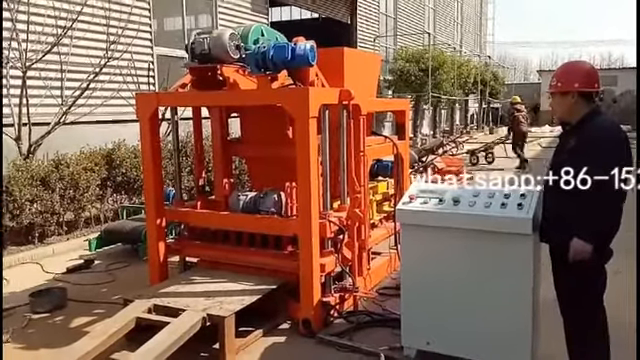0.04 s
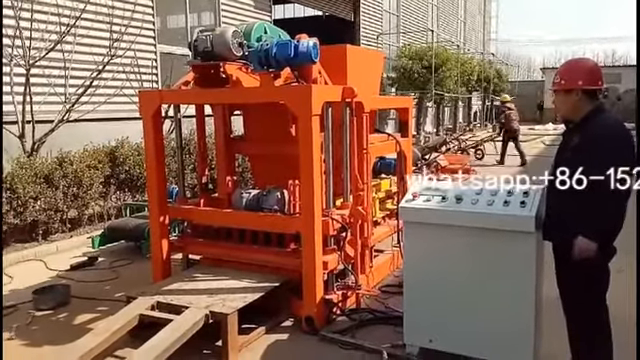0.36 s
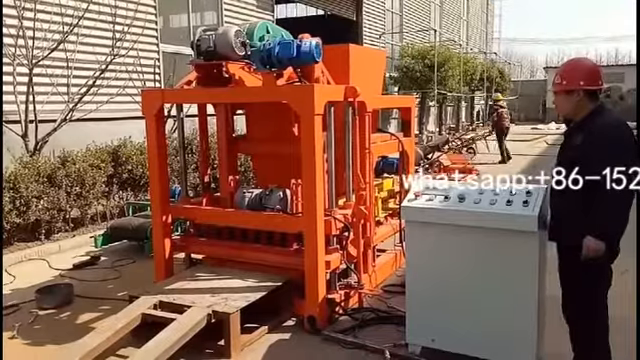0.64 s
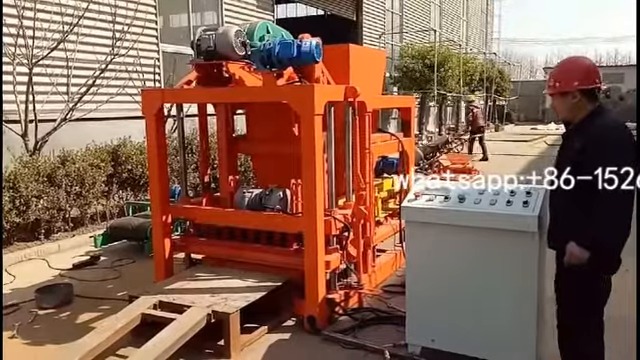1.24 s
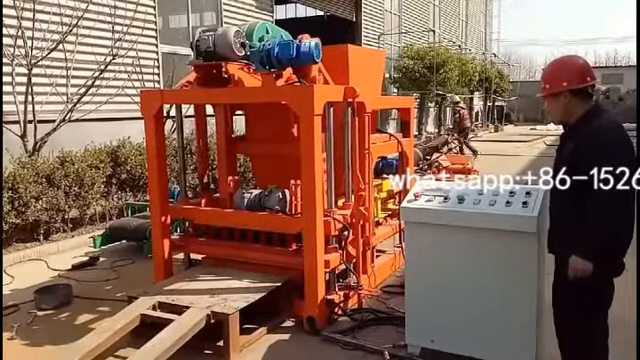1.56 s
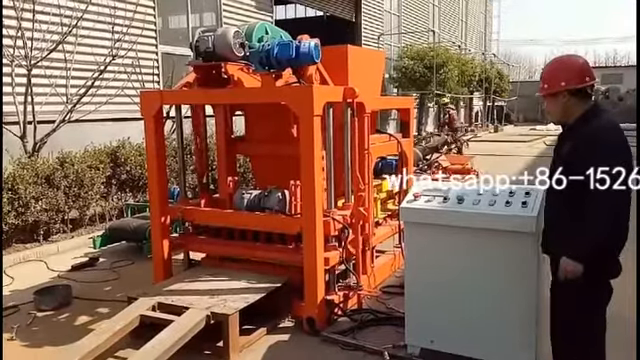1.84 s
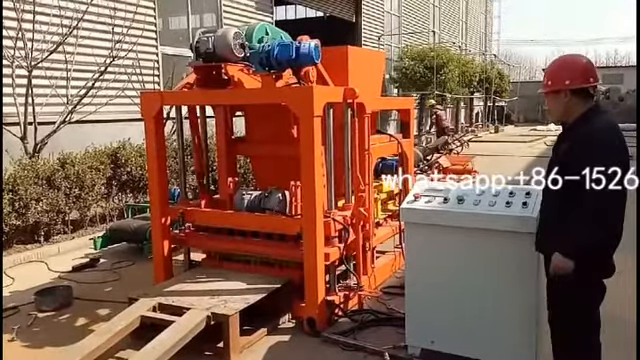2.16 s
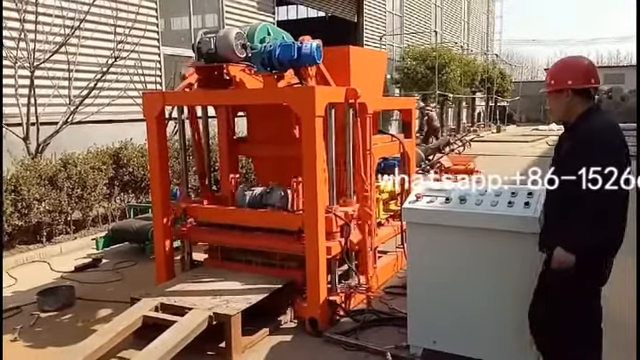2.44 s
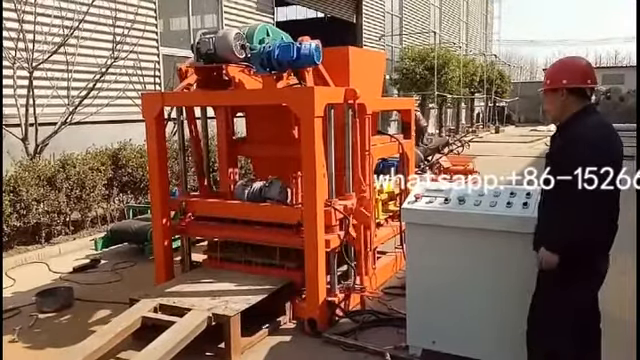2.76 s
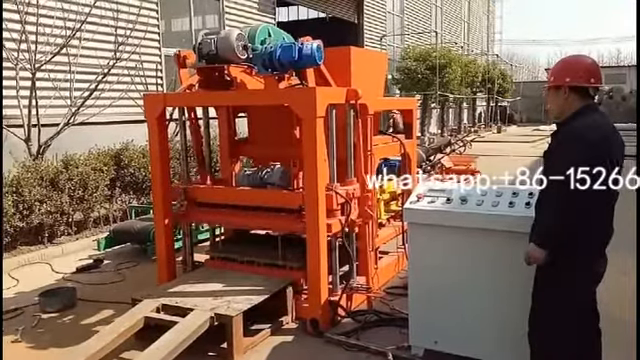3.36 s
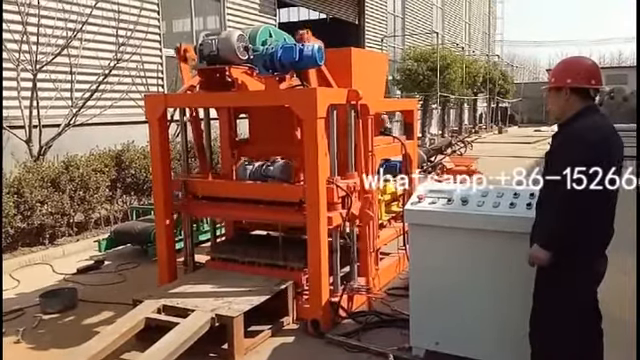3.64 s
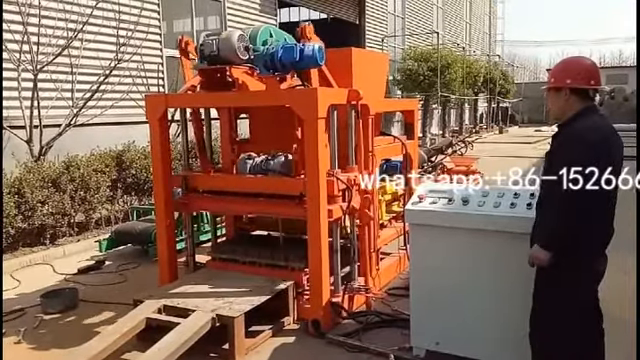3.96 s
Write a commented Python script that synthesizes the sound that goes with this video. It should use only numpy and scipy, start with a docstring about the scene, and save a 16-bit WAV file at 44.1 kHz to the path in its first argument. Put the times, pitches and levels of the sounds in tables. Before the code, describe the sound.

A concrete block machine shakes with a loud steel rattle, then runs down as a loose plate rings shrilly. Its motor drones on under metal clanks and hydraulic hiss, close to the microphone in an open yard.

```python
"""A concrete block machine in an open yard, close to a stereo microphone and a little to its left.
First the shaker hammers the steel mould once a turn and loose steel rattles over the motor's drone.
Within a second and a half it runs down while a loose plate rings shrilly. From about 1.1 s the mould
clanks as it is lifted, with a tail from the yard walls. The frame booms, oil hisses and whines in
the valves from 1.7 s, and the motor and hydraulic pump drone on to the end."""
import sys
import numpy as np
from scipy import signal
from scipy.io import wavfile
from scipy.ndimage import uniform_filter1d

SR = 44100
rng = np.random.default_rng(int(sys.argv[2]) if len(sys.argv) > 2 else 0)


def dump_mix(stems):
    """Bounce the given channels to the path in sys.argv[1] as a 16-bit WAV at rate SR."""
    frames = np.atleast_2d(stems).T  # one column per channel
    limited = np.clip(frames, -1, 1)  # hard clip at full scale
    pcm = np.round(limited * 32767).astype(np.int16)
    wavfile.write(sys.argv[1], SR, pcm)


N = 176400

# speed of the shaker: time_s, turns_per_s
SHAKER_SPEED = [(0, 47), (.36, 46), (.48, 44.6), (.56, 42.9), (.66, 39.8), (.9, 37), (1.35, 23.6)]
# blows on the mould, and hum of the table: time_s, level_db
BLOW_LEVEL = [(0, -13.5), (.15, -8), (.4, -13.5), (.56, -16), (.7, -22), (.9, -40), (1.1, -37), (1.35, -58),
              (1.6, -92)]
HUM_LEVEL = [(0, -8), (.14, -10.5), (.32, -12), (.45, -15), (.55, -17), (.64, -23), (.8, -26.5), (1.0, -37),
             (1.5, -75)]
# ring of the mould: frequency_hz, density_db
MOULD_COLOUR = [(60, -33), (150, -16), (230, -8.5), (320, 1), (450, -2), (700, -5), (1100, -2.5),
                (2000, -13), (4500, -13.5), (9000, -34.5)]
# partials of the hum: speed_multiple, level_db
HUM_PARTIALS = [(2, -18), (3, -12), (4, -14), (5, -16), (6, -15), (7, -8), (8, -20), (9, -12), (12, -12),
                (16, -19), (19, -12)]
TABLE_RESONANCE_HZ, TABLE_HALF_WIDTH_HZ, TABLE_BOOST_DB = 304, 5.8, 10.5
BLOW_JITTER_S, BLOW_SPREAD_DB = .0007, 2


def shaker(turns):
    """The table hums on multiples of its speed and throws the mould against it once a turn."""
    turn_starts = np.flatnonzero(np.diff(np.floor(turns)))
    timing, force = rng.standard_normal((len(turn_starts), 2)).T
    landings = turn_starts + (BLOW_JITTER_S * SR * timing).astype(int)
    blows = np.zeros(N)
    blows[np.clip(landings, 0, N - 1)] = from_db(BLOW_SPREAD_DB * force)
    mould = rms_one(strike(blows, dense_ring(MOULD_COLOUR, t60_s=.15)))
    hum, speed = 0, in_time(SHAKER_SPEED)
    for multiple, db in HUM_PARTIALS:
        # each partial swells as it slides through the table's resonance
        detuning = (multiple * speed - TABLE_RESONANCE_HZ) / TABLE_HALF_WIDTH_HZ
        gain = from_db(db + TABLE_BOOST_DB / (1 + detuning ** 2) + 3.2 * drift(6.4))
        phase = 2 * np.pi * (multiple * turns + rng.random()) + .42 * drift(28)
        hum = hum + gain * np.sqrt(2) * np.sin(phase)
    return from_db(in_time(BLOW_LEVEL)) * mould + from_db(in_time(HUM_LEVEL)) * hum


# rattle of the loose steel: time_s, level_db
RATTLE_LEVEL = [(0, -5.5), (.2, -6.5), (.42, -7), (.6, -11), (.78, -13.5), (.92, -20), (1.1, -22),
                (1.3, -33.5), (1.6, -73)]
# its dense ring: frequency_hz, density_db
STEEL_COLOUR = [(100, -18.5), (300, -2.5), (700, -4.5), (1150, -2.5), (1650, 0.5), (1950, -7.5),
                (2400, 1.5), (2800, -6.5), (3200, 1), (3750, -10.5), (4400, -1.5), (5000, -12),
                (5600, -6.5), (6200, -6), (7200, -22.5), (8200, -51.5), (15000, -33)]
# its clear modes: pitch_hz, level_db, t60_s
STEEL_MODES = [(880, -19, 0.04), (1090, -13, 0.031), (1310, -19.5, 0.071), (1434, -22, .14),
               (1638, -13.5, 0.036), (1780, -22, 0.065), (2415, -20.5, 0.03), (3185, -20.5, .08),
               (3422, -16.5, .05), (4190, -15, .04), (4520, -23.5, .12)]
RATTLES_PER_S, RATTLE_BUNCHING, RATTLE_SPREAD_DB = 700, .6, 2
SIZZLE_HZ, SIZZLE_LOSS_DB_PER_DB = 7660, .97


def rattle(turns, parts=4):
    """Loose steel parts clatter, each mostly at its own point of the turn."""
    clatter = 0
    for _ in range(parts):
        bunching = 1 + RATTLE_BUNCHING * np.cos(2 * np.pi * (turns + rng.random()))
        touches = rng.random(N) < RATTLES_PER_S / parts * bunching / SR
        force = from_db(RATTLE_SPREAD_DB * np.clip(rng.standard_normal(N), -2, 2))
        clicks = touches * force * rng.choice([-1, 1], N)
        ring = dense_ring(STEEL_COLOUR, t60_s=.086)
        clatter = clatter + strike(clicks, ring + clear_modes(STEEL_MODES, ring.shape[1]))
    level_db, clatter = in_time(RATTLE_LEVEL), rms_one(clatter)
    # the top sizzle fades faster than the rest as the rattle weakens
    sizzle_gain = from_db(SIZZLE_LOSS_DB_PER_DB * (level_db - level_db.max()))
    sizzle = sizzle_gain * filtered(clatter, "high", SIZZLE_HZ, order=5)
    return from_db(level_db) * (filtered(clatter, "low", SIZZLE_HZ, order=5) + sizzle)


# modes of the loose plate: pitch_hz, level_db
PLATE_MODES = [(5491, -14), (6108, 0), (7144, -16), (7690, -13), (9383, -21), (10083, -22), (11672, -26),
               (11940, -29), (13186, -30), (14505, -33)]
# its ringing: time_s, level_db
PLATE_LEVEL = [(0, -23.5), (.6, -32), (.66, -26), (.78, -30), (.84, -22), (.95, -33), (1.0, -31),
               (1.03, -34), (1.065, -27), (1.16, -38.5), (1.2, -55), (1.35, -80)]
# brief flares of its lower modes: peak_s, half_length_s, pitch_hz, level_db
PLATE_FLARES = [(.905, .025, 5500, -33), (1.03, .025, 5500, -35), (1.025, .045, 4893, -30)]
PLATE_WAVER_DB, PLATE_WAVER_HZ = 2.2, 22


def plate():
    """A loose plate rings shrilly as the shaking dies; its modes waver, and lower ones flare up."""
    t = np.arange(N) / SR

    def mode(hz):
        """One mode, unsteady in strength and phase."""
        wander = np.array([drift(PLATE_WAVER_HZ), drift(PLATE_WAVER_HZ)])
        gain = from_db(PLATE_WAVER_DB * drift(PLATE_WAVER_HZ))
        return gain * np.sqrt(2) * np.sin(2 * np.pi * hz * t + wander)

    ringing = sum(from_db(db) * mode(hz) for hz, db in PLATE_MODES)
    flares = sum(from_db(db) * np.exp(-((t - peak_s) / half_s) ** 2) * mode(hz)
                 for peak_s, half_s, hz, db in PLATE_FLARES)
    return from_db(in_time(PLATE_LEVEL)) * ringing + flares


# clanks of the lifted mould: start_s, level_db, tilt_db_per_octave, chatter_s, thud_db
MOULD_CLANKS = [(1.089, -16, -2.5, 0.01, -9), (1.15, -22.5, -4, .02, -7), (1.325, -22.5, -2.5, .03, -17),
                (1.381, -19, -2, 0.0077, 2), (1.487, -28, -7.5, 0.025, -8), (2.219, -22.5, 2.5, .036, -22),
                (2.326, -25.5, -3, .04, -6), (2.346, -22, 0, .035, -5.5), (2.372, -30, 2, 0.025, -8),
                (2.425, -27, -3, 0.066, -6), (2.895, -26, -4, 0.039, -4), (2.927, -19.5, 2.5, 0.021, -10),
                (2.966, -19.5, 8.5, 0.03, -3), (3.343, -30, -2, 0.005, -20), (3.545, -18.5, 7.3, 0.031, -3),
                (3.599, -22.5, 0.5, 0.066, -5.5), (3.64, -27, -2, 0.08, -10), (3.984, -31, -3, 0.024, -4)]
# dense ring of the frame: frequency_hz, density_db
FRAME_COLOUR = [(120, -25), (400, 3), (620, -8), (830, 3.5), (1200, 1.5), (2100, 0.5), (3500, 2.5),
                (5000, -4.5), (6700, 0), (7400, -30.5), (8200, -42), (11000, -38), (15000, -45.5)]
# its clear modes: pitch_hz, level_db, t60_s
FRAME_MODES = [(835, -13, .07), (1177, -19.5, 0.037), (1665, -18, 0.086), (3420, -21.5, .4),
               (4650, -19, .15), (6160, -19.5, .15)]
CHATTER_PER_S, YARD_TAIL_DB = 1100, -8.5


def clanks():
    """A first touch and a dying chatter on frame and mould; the yard walls send back a tail."""
    out, t = np.zeros((2, N)), np.arange(SR) / SR
    tail = from_db(YARD_TAIL_DB) * dense_ring(FRAME_COLOUR, t60_s=.7, tilt_db=-.5)
    size = tail.shape[1]
    modes = clear_modes(FRAME_MODES, size)
    for start_s, db, tilt_db, chatter_s, thud_db in MOULD_CLANKS:
        touches = rng.random(SR) < CHATTER_PER_S / SR
        clicks = touches * rng.standard_normal(SR) * np.exp(-t / chatter_s)
        clicks[0] = 2.5  # the firm first touch
        clicks *= np.sqrt(chatter_s * SR / np.sum(clicks ** 2))  # longer chatter carries more energy
        frame = dense_ring(FRAME_COLOUR, t60_s=.065, tilt_db=tilt_db) + modes
        start = int(start_s * SR)
        hit = strike(clicks, frame + tail + from_db(thud_db) * thud(size))[:, :N - start]
        out[:, start:start + hit.shape[1]] += from_db(db) * hit
    return out


def thud(size, band_hz=(400, 1250), t60_s=.07):
    """The short, low ring of the heavy mould after one touch; unit energy."""
    dying = rng.standard_normal((2, size)) * decay(size, t60_s)
    band = filtered(dying, "band", band_hz)
    return rms_one(spread(*band, np.mean(band_hz))) / np.sqrt(size)


# motor's roar, frame's boom, oil's hiss and pump's thrum: time_s, level_db
MOTOR_LEVEL = [(0, -22.5), (.95, -31.5), (1.2, -21.5), (2.0, -25), (2.6, -24), (3.2, -25), (3.5, -24.5),
               (4, -25)]
BOOM_LEVEL = [(0, -72), (1.05, -44), (1.33, -28), (1.52, -23), (1.66, -19.5), (1.8, -25), (1.95, -42),
              (4, -47.5)]
OIL_LEVEL = [(0, -26), (1.6, -67), (1.71, -40), (1.81, -32.5), (2.15, -40), (2.5, -36), (2.85, -36.5),
             (3.1, -30), (3.25, -40), (4, -40)]
THRUM_LEVEL = [(0, -42), (1.1, -41), (1.24, -26), (1.4, -35), (1.5, -30.5), (2.2, -41), (2.7, -29),
               (2.95, -33.5), (3.3, -25.5), (3.48, -42), (4, -31)]
# roar and hiss: frequency_hz, density_db
MOTOR_COLOUR = [(15, -44), (25, -8.5), (92, 5.5), (194, -2), (356, 1), (431, -4), (562, -7), (789, -5),
                (1250, -11.5), (1510, -8.5), (1930, -13.5), (3520, -16.5), (5060, -27), (6280, -26),
                (8000, -134), (10400, -86), (17600, -120)]
OIL_COLOUR = [(900, -26.5), (1900, 5), (2600, 8.5), (3100, 6), (3800, 6), (4400, 6), (5000, 0.5),
              (6400, 3.5), (7200, -2), (8000, -38), (15000, -59)]
# tones of motor and pump: pitch_hz, level_db
PUMP_TONES = [(91.5, -38), (210, -40), (322, -45), (366, -39), (413, -35.5), (850, -41), (1525, -41),
              (1590, -46.5), (2579, -47)]


def power_pack():
    """Behind the steel: motor roar, rough pump tones, a swelling boom and thrum, and the hiss of oil."""
    roar = from_db(in_time(MOTOR_LEVEL)) * noise(MOTOR_COLOUR, N, flicker_db=2)
    tones = sum(from_db(db) * rough_tone(hz, width_hz=12) for hz, db in PUMP_TONES)
    boom = from_db(in_time(BOOM_LEVEL)) * rough_tone(hz=93.8, width_hz=8)
    oil = from_db(in_time(OIL_LEVEL)) * noise(OIL_COLOUR, N)
    thrum = from_db(in_time(THRUM_LEVEL)) * rough_tone(hz=127.2, width_hz=15)
    return filtered(roar + oil, "low", hz=7300, order=6) + tones + boom + thrum


# whines of the valves: start_s, length_s, level_db, pitch_hz, half_width_hz
VALVE_WHINES = [(1.74, 0.72, -33.5, 3420, 87), (1.76, .2, -38.5, 4215, 50), (1.74, 0.41, -38, 1545, 28),
                (2.6, .5, -37, 3650, 190), (2.8, .13, -35, 2500, 120)]
WHINE_ATTACK_S, WHINE_RELEASE_S, WHINE_SAG_DB_PER_S = .037, .12, 12


def valve_whine():
    """Each time a valve opens the oil sings in a broad resonance, which weakens and dies."""
    out, t = 0, np.arange(N) / SR
    for start_s, length_s, db, hz, half_hz in VALVE_WHINES:
        age = t - start_s
        opening = np.clip(age / WHINE_ATTACK_S, 0, 1)
        closing = np.exp(-np.maximum(age - length_s, 0) / WHINE_RELEASE_S)
        singing = rms_one(filtered(rng.standard_normal((2, N)), "band", [hz - half_hz, hz + half_hz]))
        out = out + opening * closing * from_db(db - WHINE_SAG_DB_PER_S * age) * singing
    return out


def duck(drone, trigger, knee_db=-19.5, ahead_s=.0089, smooth_s=.038, bass_hz=220):
    """Gain control: loud clanks push the drone down, its bass much further."""
    power = uniform_filter1d(np.mean(trigger ** 2, axis=0), int(smooth_s * SR))
    power_ahead = np.interp(np.arange(N) + ahead_s * SR, np.arange(N), power)
    gain = 1 / np.sqrt(1 + np.abs(power_ahead) / from_db(knee_db) ** 2)
    bass = signal.sosfiltfilt(signal.butter(2, bass_hz, fs=SR, output="sos"), drone)
    return gain * (drone - bass) + gain ** 3.4 * bass


# likeness of left and right at the microphone: frequency_hz, correlation
STEREO_LIKENESS = [(30, 0.27), (90, 0.92), (300, 0.98), (600, 0.7), (1200, 0.38), (2500, 0.14), (5000, 0),
                   (15000, 0.065)]


def spread(mid, side, hz):
    """Two unrelated signals to stereo, less alike towards the treble."""
    alike = np.clip(at_hz(STEREO_LIKENESS, hz), -.99, .99)
    return np.sqrt(1 + alike) * mid + np.sqrt(1 - alike) * side * np.array([[1], [-1]])


def noise(colour, size, flicker_db=0, tilt_db=0, t60_s=None):
    """Stereo noise in narrow bands, steady, flickering or dying away; tilt is per octave; rms 1."""
    edges = np.r_[np.geomspace(24, 700, 12)[:-1], np.geomspace(700, 16000, 26)]
    white, out = rng.standard_normal((2, 2, size)), 0
    for k, (low, high) in enumerate(zip(edges, edges[1:])):
        hz = np.sqrt(low * high)
        envelope = decay(size, t60_s) if t60_s else from_db(flicker_db * drift(17.7))
        band = filtered(white[k % 2] * envelope, "band", [low, high])
        gain = np.sqrt(high - low) * from_db(at_hz(colour, hz) + tilt_db * np.log2(hz))
        out = out + gain * rms_one(spread(*band, hz))
    return rms_one(out)


def dense_ring(colour, t60_s, tilt_db=0):
    """The dense ring of a steel part after one touch; unit energy."""
    size = int(.6 * SR)
    return noise(colour, size, tilt_db=tilt_db, t60_s=t60_s) / np.sqrt(size)


def clear_modes(modes, size):
    """A steel part's clear modes after one touch, each with the energy of its level."""
    out, t = 0, np.arange(size) / SR
    for hz, db, t60_s in modes:
        phase = 2 * np.pi * (hz * t + rng.random())
        out = out + from_db(db) * rms_one(spread(np.sin(phase), np.cos(phase), hz) * decay(size, t60_s))
    return out / np.sqrt(size)


def strike(clicks, ring):
    """Each click sets the ring going."""
    return signal.fftconvolve(clicks[None], ring, axes=1)[:, :N]


def rough_tone(hz, width_hz):
    """A resonance kept ringing by uneven excitation; stereo, rms 1."""
    phase = 2 * np.pi * hz * np.arange(N) / SR
    mid, side = [drift(width_hz) * np.cos(phase) + drift(width_hz) * np.sin(phase) for _ in range(2)]
    return rms_one(spread(mid, side, hz))


def drift(rate_hz):
    """A slow random wander with spread 1."""
    step, settle = 40, 2000
    pole = np.exp(-2 * np.pi * rate_hz * step / SR)
    white = rng.standard_normal(N // step + settle + 2)
    slow = signal.lfilter([1], [1, -2 * pole, pole * pole], white)[settle:]
    return np.interp(np.arange(N) / step, np.arange(len(slow)), rms_one(slow))


def filtered(x, kind, hz, order=2):
    """Low-, high- or band-pass."""
    return signal.sosfilt(signal.butter(order, hz, kind, fs=SR, output="sos"), x)


def decay(size, t60_s):
    """An envelope that falls 60 dB in t60_s."""
    return from_db(-60 * np.arange(size) / SR / t60_s)


def from_db(db):
    """Decibels to gain."""
    return 10 ** (np.asarray(db) / 20)


def rms_one(x):
    """Scale to rms 1."""
    return x / np.sqrt(np.mean(x ** 2) + 1e-20)


def in_time(rows):
    """Read a time curve at every sample."""
    return np.interp(np.arange(N) / SR, *np.transpose(rows))


def at_hz(rows, hz):
    """Read a table on a log-frequency axis."""
    frequencies, values = np.transpose(rows)
    return np.interp(np.log(hz), np.log(frequencies), values)


def pan(left_db):
    """Stereo gains, the left louder by left_db."""
    return from_db(np.array([[left_db], [-left_db]]) / 2)


def scene():
    """From the microphone: the plate in the centre, the rest of the machine a little to the left."""
    turns = np.cumsum(in_time(SHAKER_SPEED)) / SR
    hits = clanks()
    shaking = pan(left_db=4) * (shaker(turns) + rattle(turns)) + plate()
    drone = duck(power_pack() + valve_whine(), hits)
    return shaking + pan(left_db=3.5) * hits + pan(left_db=5) * drone


def record(dry):
    """After the microphone the loudest peaks are rounded off; the deepest bass and the top are cut."""
    rounded = dry / (1 + np.abs(dry) ** 5) ** (1 / 5)
    trimmed = filtered(rounded, "high", hz=65, order=1)
    top_cut = signal.cheby2(14, 60, 16000, fs=SR, output="sos")  # 60 dB down from 16 kHz
    return signal.sosfilt(top_cut, trimmed)


dry = scene()
out = record(dry)
dump_mix(out)
```